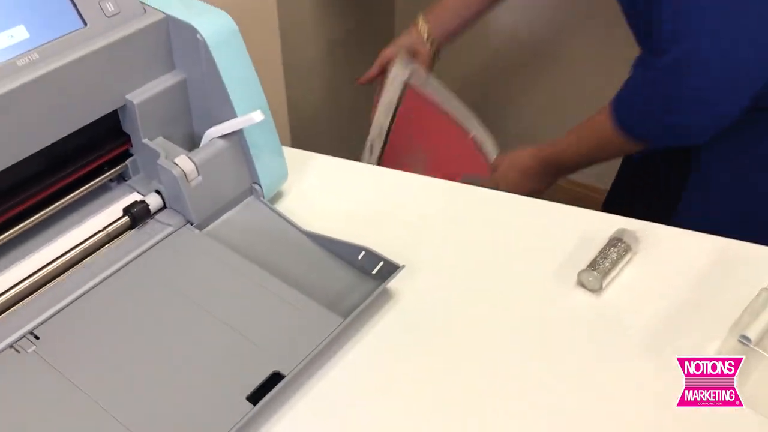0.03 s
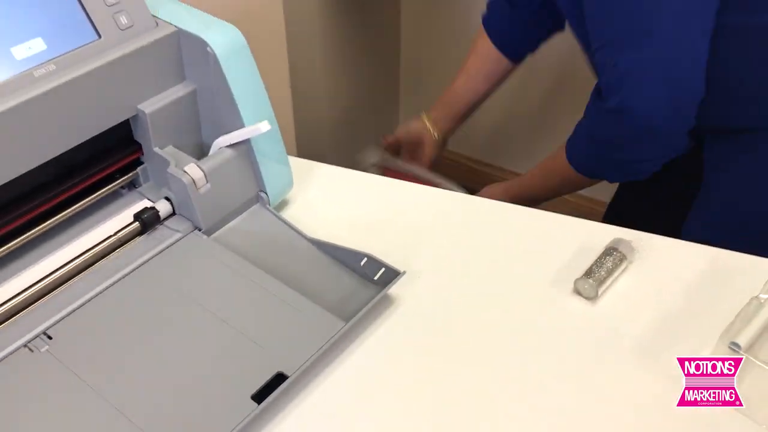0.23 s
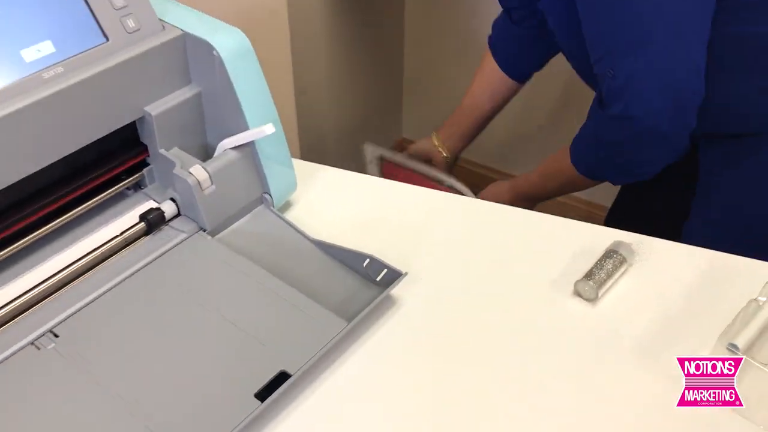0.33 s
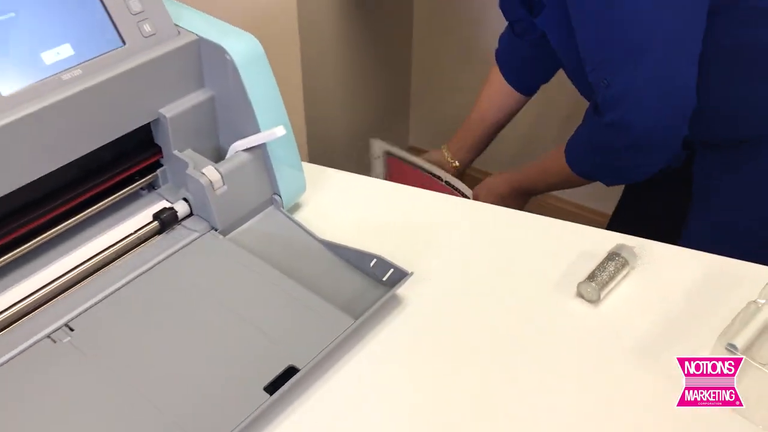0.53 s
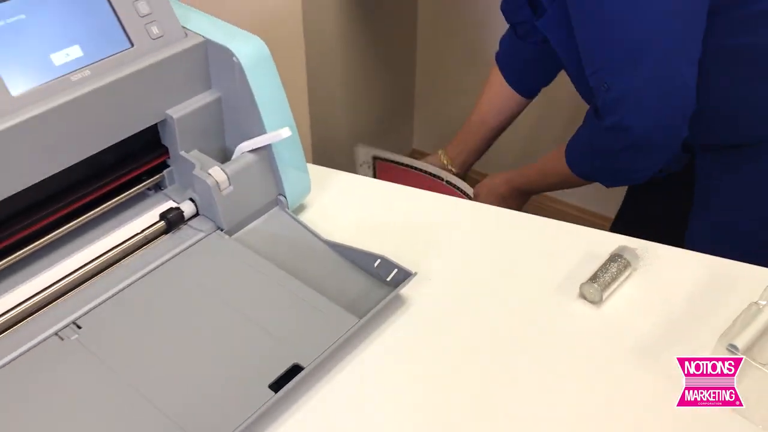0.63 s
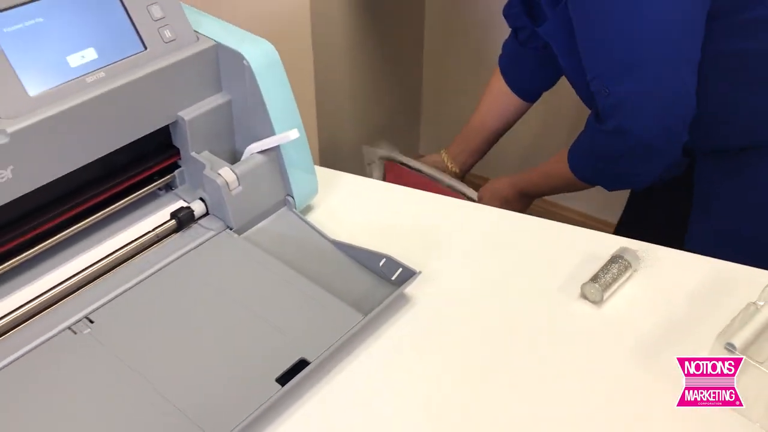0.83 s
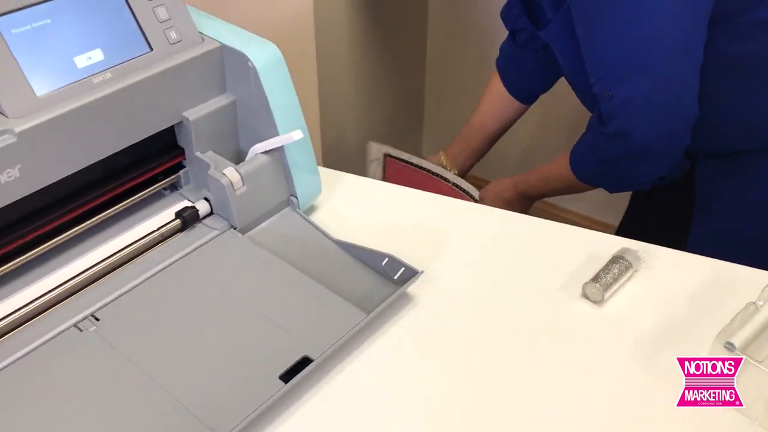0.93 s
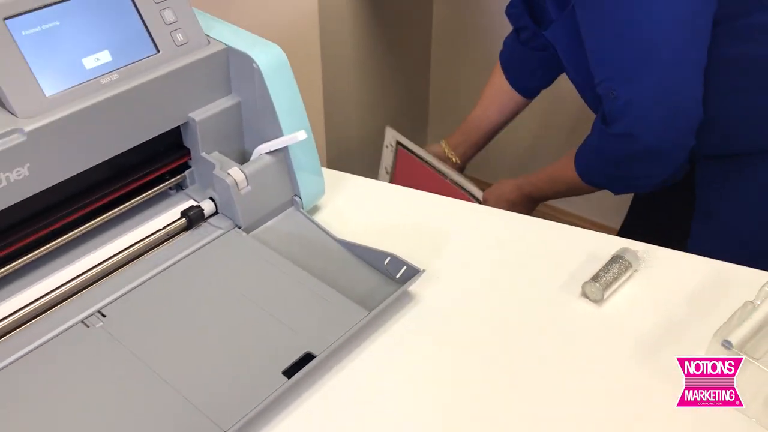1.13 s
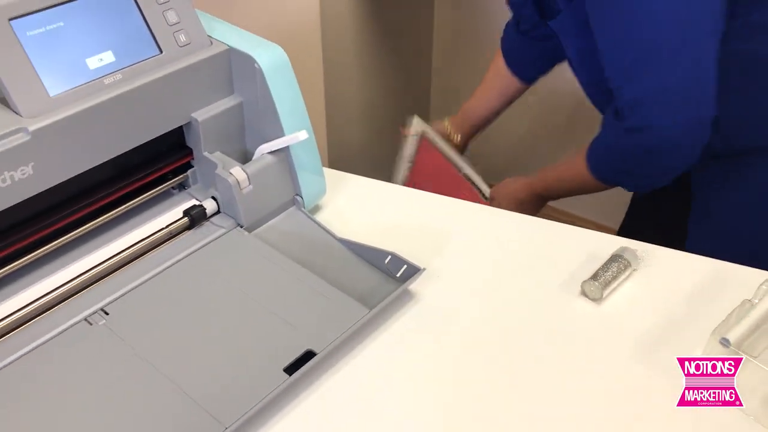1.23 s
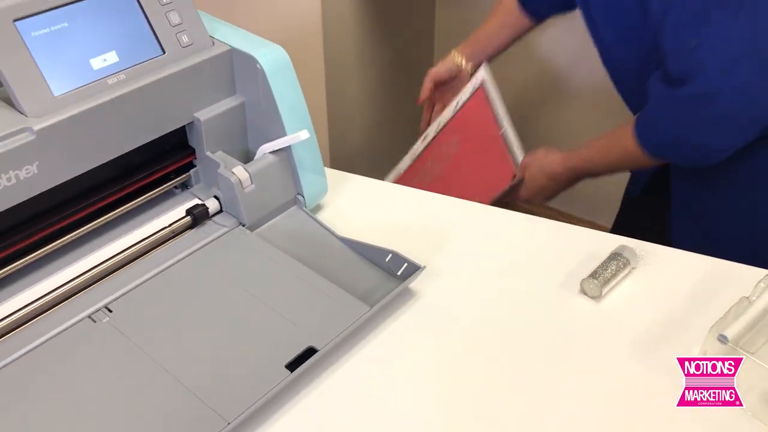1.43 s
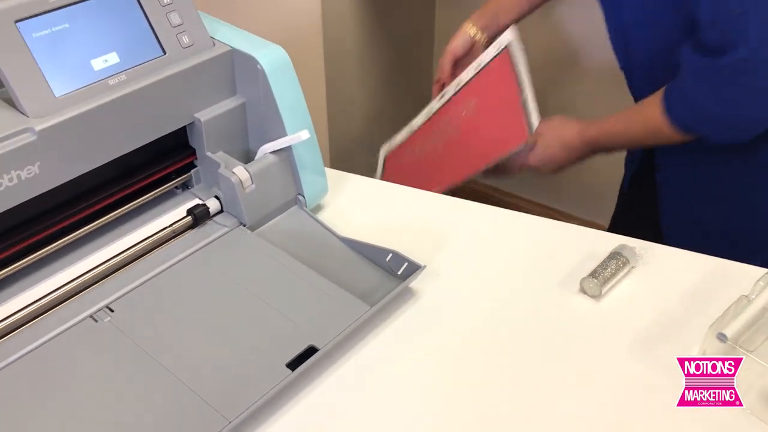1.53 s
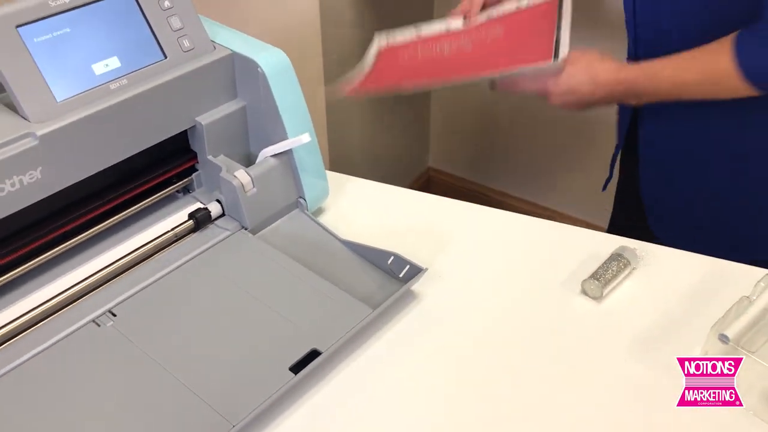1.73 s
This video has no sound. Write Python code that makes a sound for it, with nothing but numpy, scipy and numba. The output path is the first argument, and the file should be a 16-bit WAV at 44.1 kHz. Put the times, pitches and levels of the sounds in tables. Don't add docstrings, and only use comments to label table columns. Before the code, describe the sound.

Sharp raps of a stiff plastic mat on a hollow bin, close in a small room. Low hum and hiss first, a faint tick at 0.12 s, then knocks from 0.21 to 1.35 s, roughly every 0.14 s, hardest and brightest near 1.07 s. Each cracks, rattles and booms with a short echo. Small ticks and soft rustling fade into hum until about 2 s.

```python
import sys
import numpy as np
from scipy import signal
from scipy.fft import rfft, irfft
from scipy.io import wavfile
from scipy.ndimage import uniform_filter1d
from numba import njit

SR = 44100
rng = np.random.default_rng(int(sys.argv[2]) if len(sys.argv) > 2 else 0)


def to_wav(sig):
    pcm = np.clip(np.atleast_2d(sig), -1, 1) * 32767
    pcm = np.round(pcm).astype(np.int16)
    wavfile.write(sys.argv[1], SR, pcm.T)


def volts(x):
    e = np.asarray(x, float) / 20
    return 10 ** e


N = 79380
T = np.arange(N) / SR


def level(x, db):
    return x * volts(db) / np.sqrt(np.mean(x ** 2))


def band(x, hz, width):
    centre = min(hz, 0.45 * SR)
    return signal.lfilter(*signal.iirpeak(centre, centre / width, fs=SR), x)


def fade(t, t60):
    return np.exp(-np.log(1000) * t / t60)


def add(out, s, x):
    i = int(s * SR)
    out[i:i + len(x)] += x[:len(out) - i]


def swell(t, rise, t60):
    shoulder = 1.355
    held = np.maximum(t - rise, 0) / t60
    return np.minimum(t / rise, 1) * volts(-60 * held ** shoulder)


@njit
def follow(x, up, down):
    y, e = np.empty(len(x)), 0.
    for i in range(len(x)):
        e += (abs(x[i]) - e) * (up if abs(x[i]) > e else down)
        y[i] = e
    return y


def air():
    # corner_hz, density_db (dB per Hz)
    hiss_curve = [(120, -58), (200, -7.5), (448, -18), (579, -17), (683, -23), (2090, -23.5), (2290, -25.5),
                  (16000, -34)]
    # centre_hz, width_hz, level_db
    hum_bands = [(48, 14.4, -53), (130, 19.2, -45.5), (200, 60, -64.5)]
    hiss_db, whine_hz, whine_db = -54, 14260, -76
    hz = np.fft.rfftfreq(N, 1 / SR) + 1
    curve_hz, curve_db = np.array(hiss_curve).T
    shape = volts(np.interp(np.log(hz), np.log(curve_hz), curve_db))
    shape = shape * np.minimum(hz / 150, 1) ** 2
    out = level(irfft(rfft(rng.standard_normal(N)) * shape, N), hiss_db)
    for f, width, db in hum_bands:
        out += level(band(band(rng.standard_normal(N), f, width), f, 2 * width), db)
    return out + volts(whine_db) * np.sqrt(2) * np.sin(2 * np.pi * whine_hz * T)


def room(x):
    room_db, low_t60_s, high_t60_s, gap_s = -15.5, 0.38, 0.24, 0.006
    t = T[:SR // 2]
    noise = rng.standard_normal(len(t)) * (t > gap_s)
    low = signal.lfilter(*signal.butter(2, 1500, fs=SR), noise)
    tail = low * fade(t, low_t60_s) + (noise - low) * fade(t, high_t60_s)
    tail *= volts(room_db) / np.sqrt(np.sum(fade(t, high_t60_s) ** 2))
    return signal.fftconvolve(x, tail)[:N]


def rustle():
    # start_s, end_s, level_db, centre_hz
    rubs = [
        (-0.039, 0.52, -60, 1200),
        (0.27, 0.39, -41.5, 3230),
        (0.35, 1.6, -62.5, 14000),
        (1.34, 1.35, -39.5, 2900),
        (1.64, 1.76, -58, 1360),
        (0.87, 2.35, -49, 44),
        (1.7, 1.763, -57, 3000),
    ]
    out = np.zeros(N)
    for s, end, db, hz in rubs:
        grains = rng.standard_normal(N) * volts(0.83 * rng.exponential(size=N))
        env = np.sin(np.pi * np.clip((T - s) / (end - s), 0, 1))
        out += env * level(band(grains, hz, 0.47 * hz), db)
    return out


def ticks():
    # start_s, peak_db, centre_hz, t60_s
    tick_table = [(.118, -47.5, 1540, 0.098), (0.118, -51.5, 7100, 0.12), (0.2582, -42.5, 13800, 0.073),
                  (0.292, -45, 9000, 0.051), (.533, -55, 13500, 0.014), (.5657, -36.5, 13100, 0.019),
                  (0.6932, -40.5, 6600, 0.067), (.826, -42.5, 9250, 0.091), (0.9803, -41, 9300, 0.065),
                  (1.0655, -26.5, 4350, 0.02), (1.068, -24, 3100, .04), (0.93, -36, 4260, 0.048),
                  (.36, -37.5, 2800, .06), (0.388, -36, 13300, 0.017), (0.222, -37.5, 7100, 0.057),
                  (.335, -38.5, 4200, 0.033), (0.714, -48, 13200, 0.086), (1.12, -39.5, 10300, 0.041),
                  (1.387, -55, 13100, 0.059), (1.424, -49, 3440, 0.037), (1.453, -50.5, 6400, 0.031),
                  (1.565, -65, 13600, 0.048), (1.683, -49, 3140, 0.041), (1.731, -73, 4200, 0.089),
                  (1.743, -49.5, 2040, 0.13)]
    snap_db, snap_s = -5.5, 0.0002
    out, t = np.zeros(N), T[:SR // 8]
    for s, db, hz, t60 in tick_table:
        env = fade(t, t60) + volts(snap_db) * np.exp(-t / snap_s)
        noise = rng.standard_normal(len(t))
        colour = level(band(band(noise, hz, 0.45 * hz), hz, 1.5 * hz), 0)
        add(out, s, volts(db) * env * colour)
    return out


def bin_boom():
    # start_s, level_db, pitch_hz, push_s, t60_s
    boom_table = [(.222, -32, 200, 0.024, 0.9), (.297, -19.5, 239.6, 0.016, .2),
                  (.318, -24, 215.5, 0.004, 0.3), (.501, -18.5, 258.6, 0.0067, 0.098),
                  (0.548, -30, 216.6, 0.01, 0.57), (0.65, -24.5, 130, 0.014, 0.17),
                  (0.692, -31, 128, 0.014, 0.11), (.655, -25, 567.3, 0.01, 0.17),
                  (.66, -24, 292.2, 0.028, 0.19), (0.784, -23, 123.6, 0.0053, 0.3),
                  (.83, -24, 120, 0.012, 0.067), (0.799, -29.5, 284.1, 0.032, 0.58),
                  (0.93, -16.5, 144, 0.0078, 0.15), (.96, -32, 264.5, 0.033, 0.44),
                  (1.068, -21, 125, .015, 0.21), (1.077, -45, 375, 0.014, 0.23),
                  (1.072, -17, 1355, 0.0027, 0.21), (1.082, -23, 812, 0.014, 0.17),
                  (1.148, -28.5, 241.6, 0.016, 0.55), (1.218, -18.5, 145.7, 0.0091, 0.2),
                  (1.248, -30.5, 250, .02, 0.09), (1.353, -26, 131.2, 0.01, 0.29),
                  (1.361, -38, 400, 0.018, 0.2), (1.37, -34.5, 697, 0.0077, 0.1)]
    rough, pair_ratio = 0.35, 1.18
    thud_db, thud_s = -9, 0.014
    out, t = np.zeros(N), T[:SR // 2]
    for s, db, hz, push, t60 in boom_table:
        noise = rng.standard_normal(len(t))
        wobble = level(band(band(noise, hz, 0.94 * hz), hz, 1.2 * hz), 0)
        neighbour = np.sin(2 * np.pi * (hz / pair_ratio * t + rng.random()))
        tone = np.sin(2 * np.pi * hz * t) + 0.56 * neighbour
        thud = volts(thud_db) * np.sin(np.pi * hz * t) * np.exp(-np.maximum(t - push, 0) / thud_s)
        add(out, s, volts(db) * swell(t, push, t60) * ((1 - rough) * tone + rough * wobble + thud))
    return out


def sheet(count=60):
    # start_s, level_db, rise_s, rattle_t60_s, brightness_hz
    shudder_table = [(0.214, -34, 0.0021, .12, 1670), (.222, -29, 0.017, 0.33, 1190),
                     (.29, -34, 0.038, 0.25, 1780), (0.391, -40, 0.0017, 0.11, 1620),
                     (0.481, -27, 0.0073, 0.23, 1470), (0.6409, -29.5, 0.0055, .3, 1500),
                     (.675, -34.5, 0.014, 0.19, 1560), (0.784, -27, 0.0024, 0.48, 1400),
                     (0.7953, -17.5, 0.0012, 0.11, 2390), (0.927, -26.5, 0.0013, .15, 1540),
                     (.936, -24.5, 0.0021, 0.25, 1760), (1.066, -16, 0.0082, 0.19, 1860),
                     (1.09, -31.5, 0.011, 0.46, 1510), (1.212, -29, 0.006, 0.33, 1300),
                     (1.241, -25.5, 0.013, 0.26, 1200), (1.351, -31, 0.004, .2, 930),
                     (1.36, -31, 0.0095, .4, 720)]
    low_hz, high_hz, damping = 250, 5070, 0.53
    mode_t60_s, scatter_db, rattle_per_s = 0.022, 1.2, 6000
    slope_db, drop_db = 2.5, 20.5
    out, t = np.zeros(N), T[:SR // 2]
    for s, db, rise, t60, hz in shudder_table:
        clicks = (rng.random(len(t)) < rattle_per_s / SR) * rng.standard_normal(len(t))
        luck, ring = rng.standard_normal((count, 2)), 0
        for even_hz, (detune, strength) in zip(np.geomspace(low_hz, high_hz, count), luck):
            f = even_hz * (1 + 0.021 * detune)
            octs = np.log2(f / hz)
            width = 2.2 / mode_t60_s * (f / 1000) ** 0.3
            gain = volts(slope_db * min(octs, 0) - drop_db * max(octs, 0) + scatter_db * strength)
            shaking = swell(t, rise, t60 * (hz / 2 / f) ** damping)
            drive = np.roll(clicks, rng.integers(200)) * shaking
            ring = ring + gain * band(band(drive, f, width), f, 4 * width) / np.sqrt(width)
        loudest = np.sqrt(uniform_filter1d(ring ** 2, size=441).max())
        add(out, s, ring * volts(db) / loudest)
    return out


def raps():
    # start_s, peak_db, tail_t60_s, centre_hz
    rap_table = [
        (0.2116, -35.5, 0.2, 4230),
        (0.394, -37.5, 0.098, 5940),
        (0.475, -39.5, 0.26, 3700),
        (0.483, -40, 0.13, 5900),
        (0.6416, -38.5, 0.18, 3780),
        (0.7849, -34, 0.27, 2780),
        (0.9257, -36.5, 0.24, 2960),
        (1.0642, -31.5, 0.21, 3270),
        (1.2125, -31.5, 0.11, 2960),
        (1.35, -37, 0.15, 2800),
    ]
    crack_s, crack_db = 0.00051, 3.5
    out, t = np.zeros(N), T[:SR // 4]
    for s, db, t60, hz in rap_table:
        env = fade(t, t60) + volts(crack_db) * np.exp(-t / crack_s)
        noise = rng.standard_normal(len(t))
        fizz = band(noise, hz, 1.25 * hz) + 2.4 * band(noise, 1460, 1760)
        fizz = fizz + 0.47 * np.diff(noise, prepend=0)
        add(out, s, volts(db) * env * level(fizz, 0))
    return out


def scene():
    near = raps() + sheet() + ticks() + rustle()
    boom = bin_boom()
    echo = room(near + 0.42 * boom)
    return (near + boom + echo + air())[None]


def low_pass(x):
    return signal.sosfilt(signal.butter(12, 16810, fs=SR, output="sos"), x)


def record(dry):
    duck_from_db, duck_ratio, attack_s, release_s = -46, 1.2, 0.03, 0.4
    top_hz, bottom_hz = 15750, 36
    env = follow(dry[0], 1 / (attack_s * SR), 1 / (release_s * SR))
    x = dry * np.minimum(volts(duck_from_db) / (env + 1e-9), 1) ** (1 - 1 / duck_ratio)
    x = signal.sosfilt(signal.ellip(10, 0.2, 60, top_hz, fs=SR, output="sos"), x)
    x = signal.sosfilt(signal.butter(3, bottom_hz, "high", fs=SR, output="sos"), x)
    return low_pass(x)


dry = scene()
out = record(dry)
to_wav(out)
```